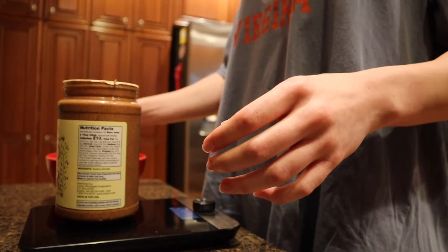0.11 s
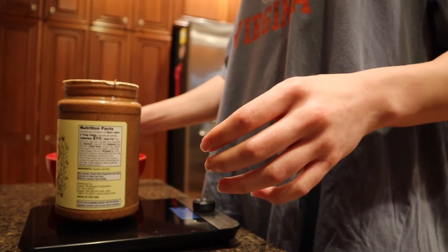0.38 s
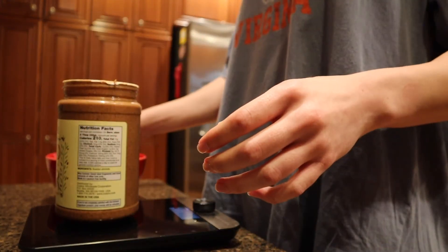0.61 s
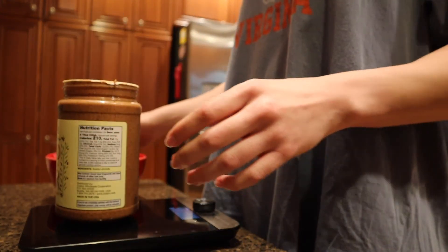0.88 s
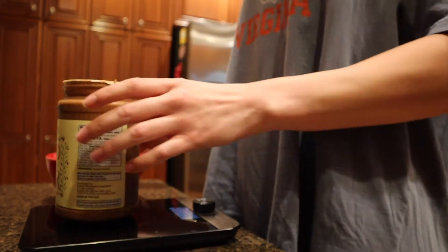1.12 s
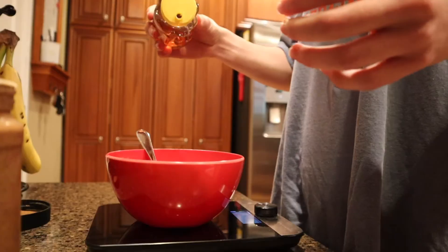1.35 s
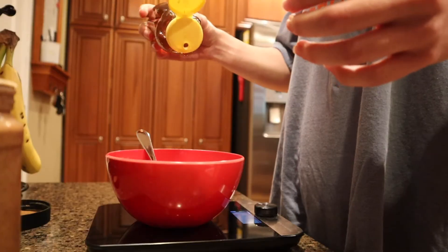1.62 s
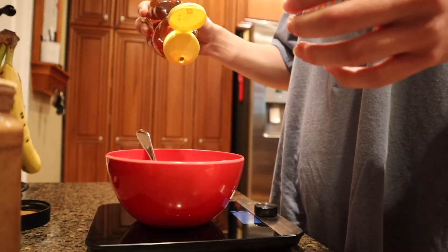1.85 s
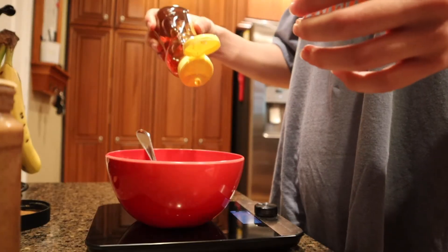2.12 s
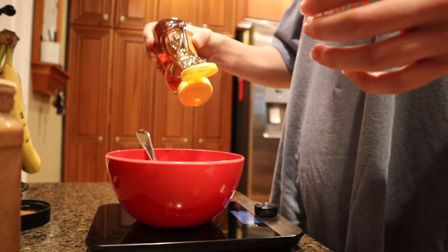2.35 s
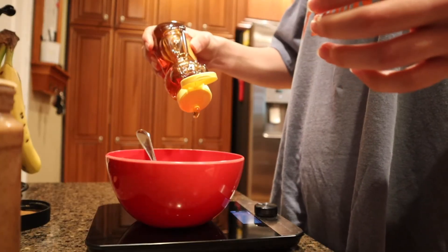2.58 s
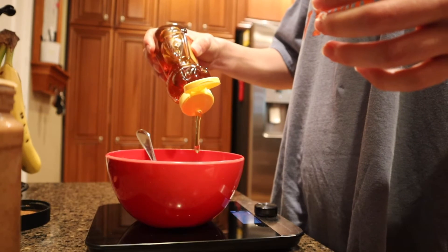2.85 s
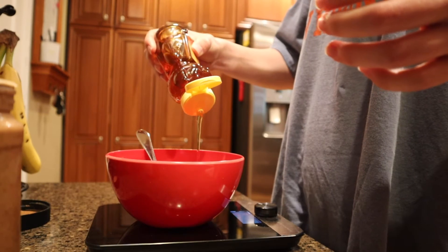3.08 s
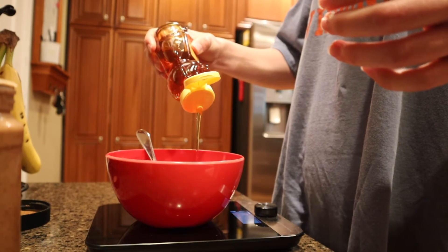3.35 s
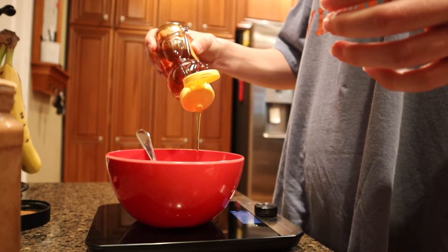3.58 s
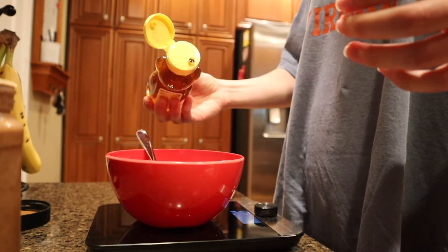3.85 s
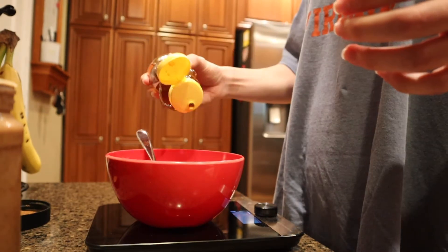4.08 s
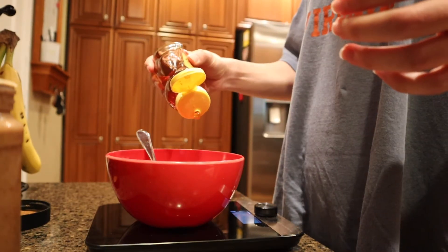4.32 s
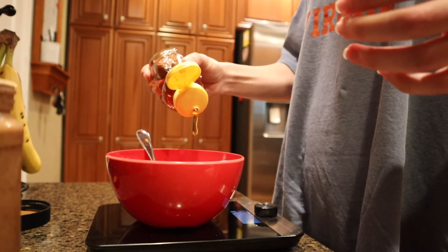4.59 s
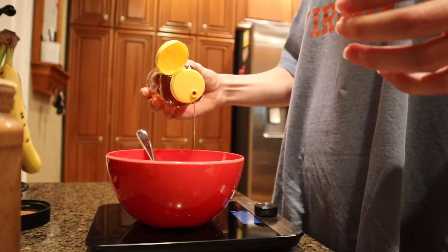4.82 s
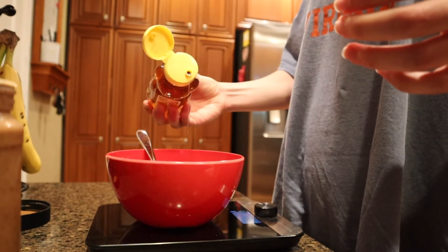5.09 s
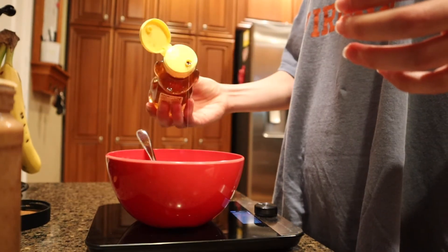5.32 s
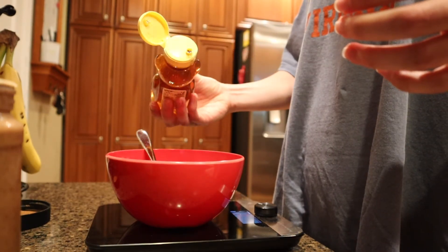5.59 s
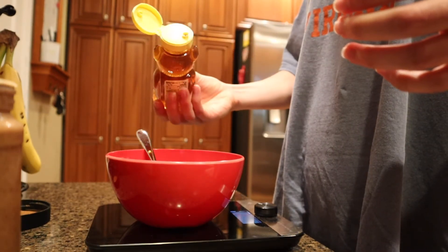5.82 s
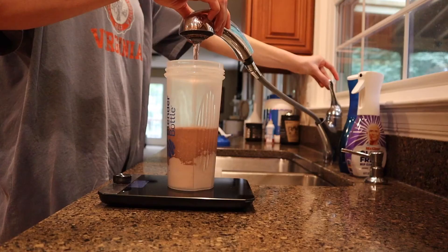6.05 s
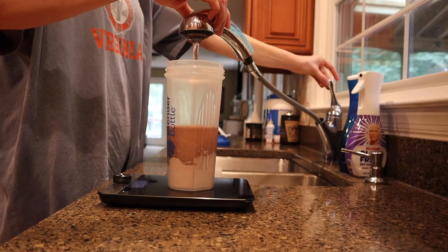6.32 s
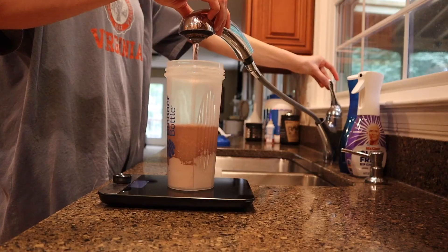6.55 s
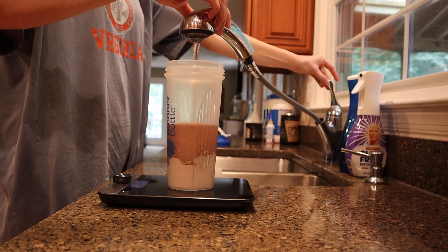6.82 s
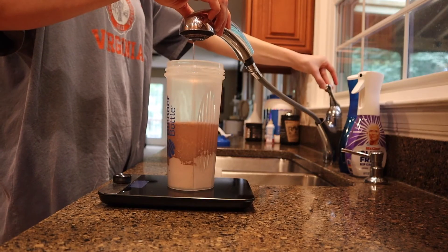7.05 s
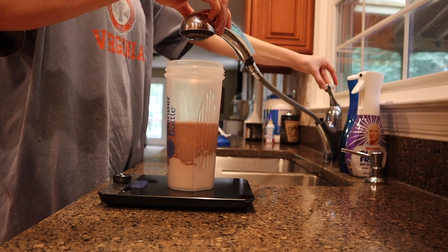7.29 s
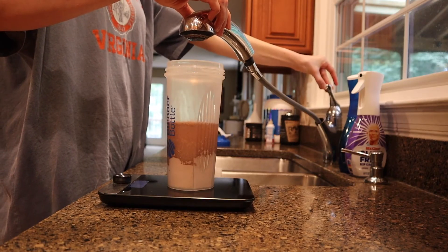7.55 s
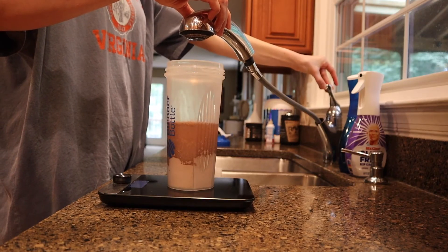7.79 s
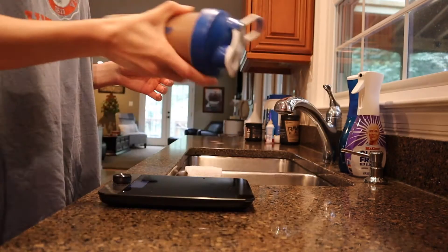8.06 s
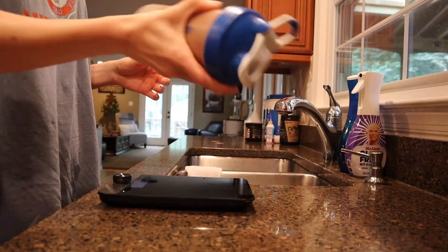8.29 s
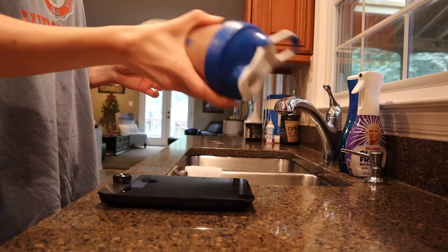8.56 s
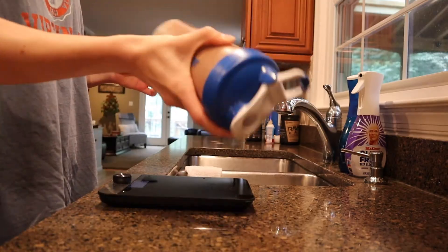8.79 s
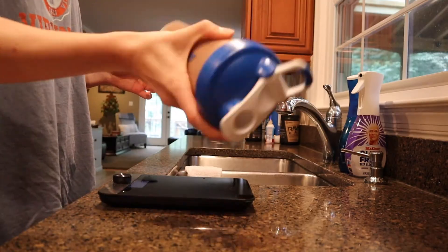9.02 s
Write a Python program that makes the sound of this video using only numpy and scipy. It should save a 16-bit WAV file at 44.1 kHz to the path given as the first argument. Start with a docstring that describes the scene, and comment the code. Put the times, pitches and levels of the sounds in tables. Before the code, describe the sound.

Kitchen fridge hum; a spoon rattles in a plastic bowl, later a thin stream stops with knocks, then a rattling, sloshing shaker bottle.

```python
"""A home kitchen heard from three places in turn, over the hum and fan noise of a refrigerator.
At the counter a spoon drops and rocks in a bowl: blows excite decaying modes and short cracks of noise.
At the sink a thin stream, shaped noise with faint whistles, runs until the tap is shut with knocks.
Then a plastic bottle is shaken: clumped grains splash, resonant bubbles gulp, and a wire mixing ball
rings the wall and lid. There are a few soft low thumps, decaying low modes, the last as the tap shuts."""
import sys
import numpy as np
from scipy import signal
from scipy.fft import rfft, irfft
from scipy.io import wavfile
from scipy.ndimage import uniform_filter1d

SR = 44100
rng = np.random.default_rng(int(sys.argv[2]) if len(sys.argv) > 2 else 0)


def file_out(sig):
    """Save sig as 16-bit WAV at sys.argv[1]."""
    # one column per channel
    cols = np.atleast_2d(sig).T
    # limit, then scale
    lim = np.clip(cols, -1, 1)
    pcm = np.round(lim * 32767).astype(np.int16)
    wavfile.write(sys.argv[1], SR, pcm)


def boost_factor(decibels):
    """Convert a level in decibels to a linear amplitude factor."""
    exponent = np.asarray(decibels, float) / 20
    return 10 ** exponent


N = 403956
# Levels in the tables are nominal: the functions that play them add the gains written there.


def rms_one(x):
    """Normalisation: scale to unit rms."""
    return x / np.sqrt(np.mean(x ** 2) + 1e-20)


def stereo(mid, side):
    """Mid-side matrix: left and right from centre and width signals."""
    return np.array([mid + side, mid - side])


def along_time(times, levels_db, left=None):
    """Linear interpolation of levels in dB, as a gain along time."""
    return boost_factor(np.interp(np.arange(N) / SR, times, levels_db, left=left))


# moments when the microphone changes place: start_s [s]
MOVES_S = [5.97, 7.9]


def by_place(levels_db):
    """Level against distance: a gain that jumps when the microphone changes place."""
    steps = boost_factor(levels_db)[np.searchsorted(MOVES_S, np.arange(N) / SR)]
    return uniform_filter1d(steps, size=300)


def colour(x, points):
    """Spectral shaping: filter by (Hz, dB) points, straight lines over log frequency; unit rms."""
    hz = np.maximum(np.arange(N // 2 + 1) * SR / N, 1)
    point_hz, point_db = np.transpose(points)
    gain = boost_factor(np.interp(np.log(hz), np.log(point_hz), point_db))
    return rms_one(irfft(rfft(x) * gain, N))


def tint(x, points):
    """Spectral shaping that keeps the overall rms."""
    return colour(x, points) * np.sqrt(np.mean(x ** 2))


def treble(x, hz):
    """Second-order high-pass: the part above a corner."""
    return signal.lfilter(*signal.butter(2, hz, "high", fs=SR), x)


def dulled(x, hz):
    """Sixth-order low-pass: the part below a corner, cut steeply."""
    return signal.sosfilt(signal.butter(6, hz, fs=SR, output="sos"), x)


def drift(rate_hz):
    """Low-passed noise: a slow random wander of unit rms."""
    r = np.exp(-2 * np.pi * rate_hz / SR)
    slow = signal.lfilter([1], [1, -2 * r, r * r], rng.standard_normal(N + SR))
    return rms_one(slow[SR:])


def patchy(x, edges_hz, patchy_db):
    """Subband modulation: each band swells and thins by itself; the rest passes."""
    out = x
    for low, high in zip(edges_hz, edges_hz[1:]):
        band = signal.sosfiltfilt(signal.butter(1, [low, high], "band", fs=SR, output="sos"), x)
        out = out + (boost_factor(patchy_db * drift(30)) - 1) * band
    return out


def ring(x, hz, t60):
    """Damped resonator: a unit click sets a decaying sine of height 1 ringing."""
    r = boost_factor(-60 / (t60 * SR))
    w = 2 * np.pi * hz / SR
    return signal.lfilter([0, np.sin(w)], [1, -2 * r * np.cos(w), r * r], x + 1e-18)


def bloom(x, hz, t60, rise_s):
    """Coupled resonators: a mode fed through a damped neighbour at its pitch swells before it dies."""
    feed = ring(x, hz, rise_s) * 2 * np.log(1000) / (rise_s * SR)
    return ring(feed, hz, t60)


def grains(per_s, spread_db):
    """Poisson process: random clicks of uneven size and sign."""
    sizes = boost_factor(spread_db * np.minimum(rng.exponential(1, N), 4)) * rng.choice([-1, 1], N)
    return sizes * (rng.random(N) < per_s / SR)


def strikes(times, gains, scatter_s):
    """Impulsive excitation: a click per blow, up to scatter_s late so that modes start out of step."""
    out = np.zeros(N)
    at = (np.array(times) + scatter_s * rng.random(len(times))) * SR
    np.add.at(out, at.astype(int), gains)
    return out


def contacts(times, gains, lengths_s):
    """Frictional contact: each touch is a scuff of dying noise that starts at the given rms."""
    size = 2000
    out = np.zeros(N + size)
    scuffs = rng.standard_normal((len(times), size))
    for s, gain, length_s, scuff in zip(times, gains, np.broadcast_to(lengths_s, len(times)), scuffs):
        decay = np.exp(-np.arange(size) / (max(length_s, 1e-4) * SR))
        start = round(s * SR)
        out[start:start + size] += gain * scuff * decay
    return out[:N]


def swells(times, levels_db, rise_s, fall_db_per_s, holds_s=0):
    """Envelope: each event rises 30 dB in rise_s, passes through its hold and dies; the loudest leads."""
    since = np.arange(N)[None] / SR - np.reshape(times, (-1, 1))
    fall = -fall_db_per_s * np.maximum(since - np.reshape(holds_s, (-1, 1)), 0)
    db = np.minimum(30 * since / rise_s, fall)
    return boost_factor(np.max(np.reshape(levels_db, (-1, 1)) + db, axis=0))


# level of the air rumble at counter, sink, shaking: level_db [dB]
PLACE_DB = [-0.32, -1, -11.5]
# spectrum of the rumble in the centre: pitch_hz [Hz], level_db [dB per Hz]
AIR_MID = [(15, -37), (25, -9), (53, -9), (91, -5.5), (145, -4.5), (317, -6), (393, -11), (475, -12),
           (573, -18), (712, -13.5), (793, -18), (2150, -25.5), (9770, -47.5), (11800, -45.5), (15900, -77)]
# spectrum of the rumble in the width: pitch_hz [Hz], level_db [dB per Hz]
AIR_SIDE = [(15, -91), (25, -52), (94, -19), (229, -8), (656, -7.5), (712, -7.5), (1100, -11.5), (1190, -8),
            (1290, -10), (2150, -12.5), (10000, -30.5), (13200, -28), (15900, -83)]
# room resonances that the fan noise fills: pitch_hz [Hz], width_hz [Hz],
# counter_db [dB], sink_db [dB], shaking_db [dB]
BOOM = [(151.7, 12, -50, -54, -63), (207, 41, -47.5, -74, -60.5), (301.7, 22, -49.5, -65, -67),
        (331.4, 28.4, -51, -53, -58.5), (506.3, 62, -59.5, -56, -65)]


def fan():
    """Broadband noise and room modes: shaped air rumble, with resonances that the fan noise fills."""
    mid = boost_factor(-42) * colour(rng.standard_normal(N), AIR_MID) * by_place(PLACE_DB)
    side = boost_factor(-47.5) * colour(rng.standard_normal(N), AIR_SIDE) * by_place(PLACE_DB)
    for hz, width_hz, *levels_db in BOOM:
        t60 = 1.48 / width_hz
        twice = ring(ring(rng.standard_normal(N), hz, t60), hz, t60)
        mid = mid + rms_one(twice) * by_place(levels_db)
    return mid, side


# hum tones: pitch_hz [Hz], waver_hz [rms Hz]
HUM = [(47, .8), (59.6, .3), (120, .5), (140.4, .8), (240, .1), (280.7, 1.5), (420, 1.5), (480, .2),
       (720, .15), (960, .3), (1200, .15), (1440, .4), (1680, .5), (2400, .6)]
# level of each hum tone: counter_db, sink_db, shaking_db [dB];
# counter_width_db, sink_width_db [dB against the centre]
HUM_DB = [(-50.5, -58, -73, -40, -28), (-49.5, -47.5, -57.5, -35, -35), (-53, -48.5, -57, -18, -22),
          (-44, -46, -54.5, -23, -18.5), (-55.5, -45, -53.5, -5.5, -10.5), (-53, -53, -64, -7, -12),
          (-67, -57.5, -68, -1.5, -14), (-62.5, -65, -65, -5, -1.5), (-54.5, -58, -58.5, -19, -2),
          (-65, -63.5, -75, -14, -6), (-64.5, -63, -59.5, -3.5, -4.5), (-71.5, -65, -73, 2.5, -5.5),
          (-66.5, -69.5, -77, -7, -2.5), (-79, -79, -80, 5, -12)]


def hum():
    """Tonal noise: sines that wander in pitch and level, with the width a quarter cycle apart."""
    mid, side = np.zeros(N), np.zeros(N)
    shaking_width_db = -12   # against the width at the sink
    for (hz, waver_hz), levels in zip(HUM, HUM_DB):
        counter_db, sink_db, shaking_db, counter_width_db, sink_width_db = levels
        phase = 2 * np.pi * np.cumsum(hz + waver_hz * drift(3.1)) / SR
        height = np.sqrt(2) * boost_factor((.3 + 2.4 * waver_hz) * drift(4.9))
        mid += height * np.sin(phase) * by_place([counter_db, sink_db, shaking_db])
        sink_side_db = sink_db + sink_width_db
        widths_db = [counter_db + counter_width_db, sink_side_db, sink_side_db + shaking_width_db]
        side += height * np.cos(phase) * by_place(widths_db)
    return mid, side


def refrigerator():
    """Superposition: fan noise and hum add up, placed a little to the right."""
    fan_mid, fan_side = fan()
    hum_mid, hum_side = hum()
    mid = fan_mid + hum_mid
    return stereo(mid, fan_side + hum_side - 0.17 * treble(mid, hz=200))


def kitchen(x, t60, wall_cut_hz):
    """Reverberation: hard walls return a short dull tail of decaying noise, unlike in each ear."""
    t = np.arange(SR // 2) / SR
    tail = rng.standard_normal((2, len(t))) * boost_factor(-60 * t / t60) * (t > .003)
    tail = signal.lfilter(*signal.butter(1, wall_cut_hz, fs=SR), tail)
    tail = tail / np.sqrt(np.sum(tail[0] ** 2))
    wet = signal.fftconvolve(x.mean(0)[None], tail, axes=1)[:, :N]
    return stereo(wet[0], 1.42 * wet[1])


def knock(s, peak_db, hz, t60):
    """Modal impact: a soft contact strikes a mode and close neighbours; loose parts rattle on."""
    near = [(1, 1), (.95, .3), (1.06, .3)]   # (pitch ratio, strength)
    soon = slice(round(s * SR), round(s * SR) + SR // 2)
    touch = np.hanning(min(int(SR / hz / 2), 90) + 3)   # about half a cycle long, 2 ms at most
    tone = 0
    for ratio, strength in near:
        click = strikes([s], [boost_factor(peak_db - 1.0) * strength], scatter_s=0.00102)[soon]
        tone = tone + bloom(click, hz * ratio, t60, rise_s=3.9 / hz)
    rattle = ring(contacts([s], [boost_factor(peak_db)], lengths_s=0.014)[soon], hz, 5.8 / hz)
    out = np.zeros(N)
    out[soon] = signal.lfilter(touch / touch.sum(), 1, tone) + boost_factor(-25.5) * rattle
    return out


# soft low thumps, the last as the tap shuts: start_s [s], level_db [dB]
LOW_THUMPS = [(2.3, -38), (4.55, -41), (5.2, -39), (7.053, -34.5)]
# low modes of the thumps: pitch_hz [Hz], level_db [dB], t60_s [s]
LOW_MODES = [(47.7, -3.5, 0.5), (74, 1.5, 0.35), (190, -9, 0.13)]


def low_thumps():
    """Modal synthesis: soft low thumps, each a few decaying low modes, the last as the tap shuts."""
    thumps = sum(knock(s, db + level_db, hz, t60) for s, db in LOW_THUMPS for hz, level_db, t60 in LOW_MODES)
    return stereo(thumps, .2 * np.roll(thumps, 6))


# spectrum of the stream: pitch_hz [Hz], level_db [dB per Hz]
STREAM_COLOUR = [(880, -29), (1500, -10), (2600, -8), (5400, -9), (5980, -9), (6510, -9.5), (9020, -12),
                 (10800, -6), (14000, -23)]
# whistles of the spout: pitch_hz [Hz], damping_hz [Hz, t60 is 3.9 / damping_hz], level_db [dB]
SPOUT = [(2370, 66, 4), (3070, 68, -5), (3423, 70, 4.5), (5120, 130, -6), (5500, 80, 2.5), (6370, 45, 6.5),
         (7480, 83, -10), (7840, 77, -8), (8400, 100, -2), (9490, 30, -4), (9660, 34, -1), (10500, 35, -2),
         (10900, 66, 6.5)]


def stream():
    """Turbulent flow: a thin stream fizzes and faintly excites spout resonances that come and go."""
    on_s, off_s = 5.968, 6.99
    flutters = [drift(8.3) for _ in SPOUT]
    wet = []
    for _ in range(2):
        fizz = rng.standard_normal(N) + 0.48 * rms_one(grains(3000, spread_db=4.5))
        water = boost_factor(1.3 * drift(25)) * colour(fizz, STREAM_COLOUR)
        for (hz, damping_hz, db), flutter in zip(SPOUT, flutters):
            whistle = rms_one(ring(fizz, hz, 3.9 / damping_hz))
            water = water + boost_factor(db + 6.0 + 1.6 * flutter) * np.sqrt(damping_hz / 1e4) * whistle
        wet.append(water)
    running = swells(on_s, -56.5, rise_s=0.008, fall_db_per_s=500, holds_s=off_s - on_s)
    dribble = swells(off_s, -59, rise_s=0.008, fall_db_per_s=180)   # what is left in the spout runs out
    return np.maximum(running, dribble) * stereo(wet[0], boost_factor(3.5) * wet[1])


# knocks of lever and metal at the sink: start_s [s], level_db [dB], pitch_hz [Hz, the pitch favoured],
# tick_db [dB against the blow], grit_db [dB against the blow]
SINK_KNOCKS = [(6.958, -29, 680, -25, -22), (6.985, -42, 5000, -20, -16), (7.034, -19, 560, -38, -34),
               (7.173, -27.5, 2740, -13, -25), (7.181, -33, 2220, -2, -7), (7.208, -29, 960, -14, -20),
               (7.215, -30.5, 2700, -9.5, -24), (7.227, -34.5, 1050, -25, -19),
               (7.224, -45, 3800, -20, -15)]
# modes of the sink: pitch_hz [Hz], level_db [dB], t60_s [s]
SINK = [(520, 0, 0.055), (605, 1, .03), (680, -4, .025), (816, 5.5, .054), (1010, -3, .046), (1162, 5, .06),
        (2220, -3.5, 0.067), (2740, 0.5, 0.023), (3800, 0.5, 0.033), (5000, -0.5, .033)]


def sink_knocks():
    """Selective modal excitation: each knock favours modes near one pitch, with ticks and grit of contact."""
    fall_db_per_octave = 51.5   # away from the favoured pitch
    s, peak_db, _, tick_db, grit_db = np.transpose(SINK_KNOCKS)
    ticks = treble(contacts(s, boost_factor(peak_db + tick_db - 8.5), lengths_s=0.01), hz=6460)
    ticks = dulled(ticks, hz=11500)
    grit = treble(contacts(s, boost_factor(peak_db + grit_db), lengths_s=0.014), hz=900)
    knocks = signal.lfilter(*signal.butter(4, 4000, fs=SR), grit)
    for at, db, spot_hz, *_ in SINK_KNOCKS:
        for hz, level_db, t60 in SINK:
            mode_db = db + level_db - fall_db_per_octave * abs(np.log2(hz / spot_hz))
            if mode_db > -55:   # weaker modes are left silent
                knocks = knocks + knock(at, mode_db, hz, t60)
    return stereo(knocks + ticks, .2 * np.roll(knocks, 6) - ticks)


# blows of spoon on bowl: start_s [s], level_db [dB], brightness [dB per octave away from 1060 Hz],
# ring_db [dB, the spoon against the blow], crack_db [dB against the blow]
SPOON = [(0.2611, -11.5, -21, -31, -16), (0.268, -23.5, -15, 3, -23), (0.277, -26, -20, -22, -20),
         (0.303, -35, -4, -15.0, -9), (0.473, -18.5, 0, -29, -6), (0.501, -12.5, 3.5, -28, -2),
         (0.523, -17.5, -3, -22, -18), (0.543, -18.5, 0, -24, -9), (0.555, -21, 0, -26, -12),
         (0.577, -17.5, 0, -27, -8), (0.597, -31, -3, -26, -12)]


def spoon_blows():
    """Decaying impacts: the listed blows, then rocking to rest, in which each rock touches twice."""
    from_s, every_s, back_s = 0.625, 0.0795, 0.0155
    touch_db, loss_db = (-20.5, -18), (4.5, 9)   # first and second touch, and their loss per rock
    sound = (-0.89, -24, -9)   # brightness, ring and crack of those touches
    rocks = [(from_s + k * every_s + back * back_s, touch_db[back] - k * loss_db[back], *sound)
             for k in range(4) for back in range(2)]
    return np.transpose(SPOON + rocks)


# chatter on the rim: start_s [s], hold_s [s], level_db [dB]
CHATTER = [(0.283, 0.004, -35), (0.302, 0.11, -44.5), (0.402, 0.057, -39.5), (0.467, 0.19, -30),
           (0.714, 0.011, -36.5), (0.86, 0.018, -45)]
# spectrum of the cracks: pitch_hz [Hz], level_db [dB per Hz]
CRACK_COLOUR = [(290, -47), (500, -24), (1030, -10), (1420, -5), (4530, -15.5), (5500, -11.5),
                (11000, -17.5), (14000, -81)]
# modes of the bowl: pitch_hz [Hz], level_db [dB], t60_s [s]
BOWL = [(360, -12, 0.08), (480, -11, .04), (674, -7, 0.034), (810, -27, .05), (920, -9, 0.05),
        (960, -5, 0.08), (1036, -1, 0.076), (1066, 0.5, 0.078), (1122, -3.5, 0.09), (1135, -16, 0.4),
        (1200, -16, 0.04), (1303, -13, 0.085), (1575, -13, 0.059), (1890, -9, 0.085), (2090, -13, .04),
        (2250, -9, 0.048), (2420, -20, 0.035), (3100, -18, 0.048), (3980, -16.5, 0.053), (5100, -23, .04),
        (5470, -16, 0.056), (5620, -14.5, .025), (5790, -18, 0.076), (6350, -17.5, 0.05)]
# modes of the spoon: pitch_hz [Hz], level_db [dB], t60_s [s]
SPOON_RING = [(2750, -30, 0.5), (2900, -28, 0.55), (2870, -0.5, 0.025), (5580, -13, 0.029),
              (8630, -19, 0.032)]


def spoon():
    """Modal synthesis: blows and rim chatter ring bowl and spoon; each blow has its own brightness."""
    s, peak_db, bright_db, ring_db, crack_db = spoon_blows()
    at_s, hold_s, chatter_db = np.transpose(CHATTER)
    chatter = swells(at_s, chatter_db, rise_s=0.0036, fall_db_per_s=600, holds_s=hold_s)
    chatter = chatter * rms_one(grains(350, spread_db=-0.5))
    cracks = contacts(s, boost_factor(peak_db + crack_db - 12.5), lengths_s=0.014)
    out = tint(cracks + boost_factor(-18.0) * chatter, CRACK_COLOUR)
    for hz, level_db, t60 in BOWL:
        # below the main ring a bright blow adds nothing
        slope = np.where(hz > 1060, bright_db, np.minimum(bright_db, 0))
        uneven_db = rng.normal(0, 1.4, len(s))
        gains = boost_factor(peak_db - 12.5 + slope * abs(np.log2(hz / 1060)) + uneven_db)
        push = 1.55 * strikes(s, gains, scatter_s=0.00041) + boost_factor(-30.5) * chatter
        out += boost_factor(level_db) * bloom(push, hz, t60, rise_s=9.6 / hz)
    for hz, level_db, t60 in SPOON_RING:
        clicks = strikes(s, boost_factor(peak_db + ring_db + level_db), scatter_s=.0005)
        out += ring(clicks + boost_factor(level_db - 39.0) * chatter, hz, t60)
    out = dulled(out, hz=12000)
    return stereo(out, 0.49 * out + 0.072 * np.roll(out, 9))   # left of centre, with a short delay in the width


# the drink under the shaking: start_s [s], splash_db [dB], bubble_db [dB against the splash]
SPLASH = [(7.903, -42.5, 2.5), (7.98, -45, -2.5), (8.025, -40, 3.5), (8.07, -39.5, 0), (8.15, -44.5, -1),
          (8.185, -36.5, -5), (8.233, -44, -3), (8.275, -36, -5), (8.4, -40, -5), (8.415, -38, 3.5),
          (8.49, -41.5, -4), (8.53, -36.5, -0.5), (8.562, -34, 4), (8.61, -39, -5), (8.74, -38, -2),
          (8.77, -33, -2), (8.86, -37.5, -4), (8.945, -42, -5), (8.97, -38, -1), (9.01, -42.5, -6),
          (9.067, -35.5, -2), (9.16, -44.5, -1.5)]


def splash_gains():
    """Amplitude envelope: gain of the splash, and of its bubbles against it."""
    at_s, splash_db, bubble_db = np.transpose(SPLASH)
    return along_time(at_s, splash_db, left=-150), along_time(at_s, bubble_db, left=-150)


# spectrum of the splash: pitch_hz [Hz], level_db [dB per Hz]
SPLASH_COLOUR = [(470, -29), (800, -10.5), (1390, -6), (1780, -5), (1980, -6.5), (2730, -7.5), (5980, -9.5),
                 (10000, -10), (11700, -12.5), (15000, -94)]
# treble of the splash against its body: start_s [s], treble_db [dB]
SPRAY = [(7.9, -5), (7.98, -2), (8.06, -5), (8.13, -8), (8.21, -1), (8.29, 1), (8.38, 2), (8.47, -4),
         (8.55, 2.5), (8.64, -4), (8.73, -7), (8.78, -0.5), (8.85, -2), (8.91, -7), (9.01, -3), (9.1, -6),
         (9.15, 1.5)]


def splash(splash_gain, bubble_gain):
    """Granular noise and bubble resonance: drops clump band by band, small bubbles ring in bursts."""
    surge = boost_factor(2.0 * drift(16) + 1.0 * drift(70) - 2.0)
    wash = [surge * colour(grains(3500, spread_db=2.5), SPLASH_COLOUR) for _ in range(2)]
    edges_hz = np.geomspace(1000, 8000, num=7)
    wash = patchy(stereo(wash[0], 1.34 * wash[1]), edges_hz, patchy_db=3.0)
    wash = wash + (along_time(*np.transpose(SPRAY)) - 1) * treble(wash, hz=5000)
    bubbles = 0
    for hz in np.geomspace(1500, 5000, num=20):
        bursts = grains(250, spread_db=1.0) * boost_factor(4.6 * drift(6.6))
        bubbles = bubbles + ring(bursts, hz, 17.0 / hz) * boost_factor(-9.0 * abs(np.log2(hz / 2750)))
    bubbles = rms_one(bubbles)
    return splash_gain * (wash + bubble_gain * stereo(bubbles, 0.25 * np.roll(bubbles, 5)))


# the drink lands at one end and gulps air: start_s [s], level_db [dB], pitch_hz [Hz]
GULPS = [(7.915, -29, 600), (8.02, -30, 600), (8.067, -21, 556), (8.179, -28.5, 650), (8.24, -36, 600),
         (8.278, -24, 600), (8.415, -30, 500), (8.539, -20, 600), (8.553, -28.5, 480), (8.704, -28, 600),
         (8.717, -25.5, 453), (8.757, -28, 560), (8.808, -19.5, 560), (8.838, -32, 420), (8.98, -29, 320),
         (9.066, -29, 620), (9.072, -19.5, 750), (9.079, -28, 450), (9.123, -22.5, 520)]


def gulp(splash_gain):
    """Bubble resonance: a big bubble rings briefly in each gulp, over froth and a gurgle in between."""
    gurgle = 0
    for hz in np.geomspace(380, 1200, num=12):
        bubble = ring(grains(70, spread_db=2.0), hz, 15.6 / hz)
        gurgle = gurgle + bubble * boost_factor(-8.0 * abs(np.log2(hz / 600)))
    gulp_s, gulp_db, _ = np.transpose(GULPS)
    froth_gain = swells(gulp_s, gulp_db - 12.5, rise_s=0.012, fall_db_per_s=500)
    out = np.maximum(froth_gain, boost_factor(-9) * splash_gain) * rms_one(gurgle)
    for s, db, hz in GULPS:
        soon = slice(round(s * SR), round(s * SR) + 4000)
        click = strikes([s], [boost_factor(db)], scatter_s=0.00028)[soon]
        out[soon] += bloom(click, hz, 8.7 / hz, rise_s=3.6 / hz)   # t60 of 8.7 cycles
    return out


# the ball skitters along the wall: start_s [s], hold_s [s], level_db [dB], pitch_hz [Hz, near the pair]
SKITTERS = [(8.0, .05, -39, 2850), (8.029, .015, -37, 1810), (8.17, 0.027, -40, 1770),
            (8.24, .02, -42.5, 1860), (8.256, .03, -38.5, 2850), (8.307, .022, -38.5, 1770),
            (8.315, .02, -41, 2800), (8.413, .02, -45, 2750), (8.518, .06, -37, 2790),
            (8.6, 0.11, -43, 1890), (8.762, 0.084, -35.5, 2780), (8.83, 0.019, -33.5, 2030),
            (8.987, 0.018, -42.5, 1750), (9.008, .045, -43.5, 2800), (9.062, .015, -35.5, 2950),
            (9.099, .018, -36, 2830)]


def skitter():
    """Sustained modal excitation: quick uneven touches of the wire ball ring a close pair of wall modes."""
    lead, length = 1000, 8000   # samples before and after the start
    out, touches = np.zeros(N), grains(450, spread_db=2.5)
    for s, hold_s, db, hz in SKITTERS:
        near = slice(round(s * SR) - lead, round(s * SR) + length)
        pair = ring(touches[near], .98 * hz, 34.0 / hz) + ring(touches[near], 1.043 * hz, 34.0 / hz)
        since = np.arange(-lead, len(pair) - lead) / SR
        envelope_db = np.minimum(3500 * since, -700 * np.maximum(since - hold_s, 0))
        out[near] += boost_factor(db + 1.0 + envelope_db) * rms_one(pair)
    return stereo(out, 0.25 * np.roll(out, 5))


# hits of the mixing ball: start_s [s], level_db [dB], pitch_hz [Hz, the mode favoured by the spot hit],
# ring_db [dB, the wall against the hit], treble_db [dB]
BALL = [(7.905, -32, 2010, -7, -10), (7.9638, -27, 2300, 4, -2), (7.996, -21, 2870, 1, -5),
        (8.005, -20, 2700, 0, 1), (8.012, -20, 2950, 1, 3.5), (8.033, -31, 1800, 10, 5),
        (8.0595, -15, 4330, -5, 3), (8.0676, -8.5, 4740, 3, 4.5), (8.1023, -13, 3600, -11, 4.5),
        (8.236, -18, 2140, -6, -0.5), (8.268, -25, 2880, 6, 2), (8.3304, -30, 2410, -2, 14),
        (8.3422, -9, 5000, 3, 4), (8.3445, -13.5, 2700, -2.5, 2.5), (8.366, -14.5, 4090, 1, 1.5),
        (8.412, -30, 2750, 0, 0), (8.4365, -29, 4000, -4, 3), (8.4887, -19, 1900, 3, -1),
        (8.511, -20, 2810, -13, -4), (8.559, -16, 1760, 0, -7), (8.6057, -24, 2200, 3, -6),
        (8.638, -18.5, 2930, 0, 6), (8.669, -16.5, 1850, -3, -4), (8.708, -27, 2800, -6, 3),
        (8.756, -13.5, 2150, -2, -1), (8.8326, -19, 1900, -1.5, 4), (8.8684, -1, 2870, -6, 8),
        (8.875, -15, 3760, 0, 1), (8.8894, -11, 3020, -10, 4), (9.027, -25, 2810, -9, -2),
        (9.0652, -19, 2930, -5, -8), (9.1226, 2.2, 2740, -5, -6.5), (9.144, -17, 4020, -11, 9)]
# spectrum of the crackle: pitch_hz [Hz], level_db [dB per Hz]
BALL_COLOUR = [(290, -46), (500, -30), (1810, -24), (2720, -8.5), (4200, -11.5), (5370, -12.5), (7270, -16),
               (8780, -13.5), (9440, -12), (13000, -22), (15900, -60)]
# modes of bottle wall and lid: pitch_hz [Hz], level_db [dB], t60_s [s]
BOTTLE = [(1770, -7, 0.031), (2320, -3.5, 0.012), (2700, 2, 0.018), (2930, -6.5, 0.043), (3620, -15, .02),
          (3995, -11.5, 0.034), (5000, -1, 0.0098), (6750, -6, .01), (8800, -14, .015)]


def ball_hits():
    """Selective modal excitation: the wire ball snaps and crackles on the plastic and rings wall and lid."""
    s, peak_db, spot_hz, ring_db, treble_db = np.transpose(BALL)
    snap = contacts(s, boost_factor(peak_db - 11.0), lengths_s=0.00022)   # the first touch is sharp
    snap = snap + strikes(s, boost_factor(peak_db + 4.5), scatter_s=0)
    crackle_s = 0.004 + 0.0001 * treble_db   # brighter hits crackle longer
    common, own = (tint(snap + contacts(s, boost_factor(peak_db - 8.5), crackle_s), BALL_COLOUR) for _ in range(2))
    hits = stereo(common, 1.16 * own - .5 * np.roll(common, 3))
    bright = along_time(s - .001, treble_db)
    hits = hits + (bright - 1) * treble(hits, hz=4500)
    for hz, level_db, t60 in BOTTLE:
        off_spot_db = -14.0 * abs(np.log2(hz / spot_hz))
        uneven_db = rng.normal(0, 1.9, len(s))
        db = peak_db + ring_db + level_db - 4.5 + off_spot_db + uneven_db
        tone = ring(strikes(s, boost_factor(db), scatter_s=.003), hz, t60)
        hits = hits + stereo(tone, 0.22 * np.roll(tone, 5))
    return hits


def bottle():
    """Superposition and level panning: ball, splash and gulps add up, held right of centre."""
    splash_gain, bubble_gain = splash_gains()
    shaken = ball_hits() + skitter() + splash(splash_gain, bubble_gain) + gulp(splash_gain)
    return shaken * boost_factor([[-1.5], [1.5]])


def scene():
    """Direct and reverberant sound: sources in the room; close ports hear little width in the bass."""
    things = spoon() + stream() + sink_knocks() + low_thumps() + bottle()
    left, right = things + boost_factor(-13.0) * kitchen(things, t60=0.21, wall_cut_hz=10300)
    port_hz = 400
    side = signal.lfilter(*signal.butter(1, port_hz, "high", fs=SR), (left - right) / 2)
    return refrigerator() + stereo((left + right) / 2, side)


def top_cut(x):
    """Nothing passes above the cut-off."""
    return signal.sosfilt(signal.butter(12, 16040, fs=SR, output="sos"), x)


def record(dry):
    """Transducer limits: the microphone fades in the top octave, and levels past full scale clip."""
    top_hz = 12000
    dull = signal.sosfilt(signal.butter(4, top_hz, fs=SR, output="sos"), dry)
    mix = np.clip(dull + 0.15 * (dry - dull), -1, 1)
    return top_cut(mix)


dry = scene()
out = record(dry)
file_out(out)
```